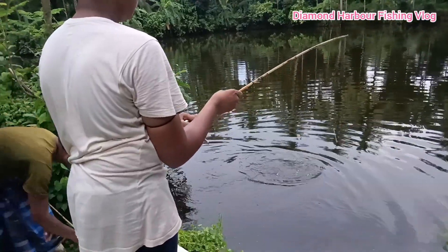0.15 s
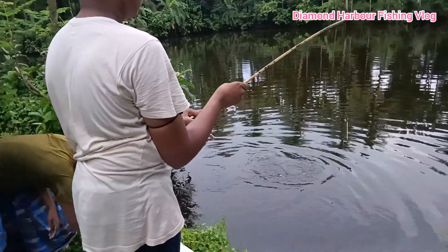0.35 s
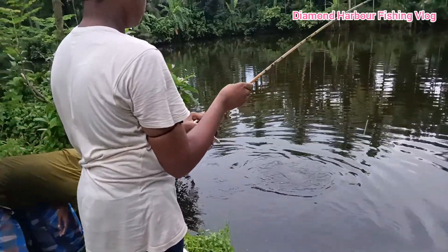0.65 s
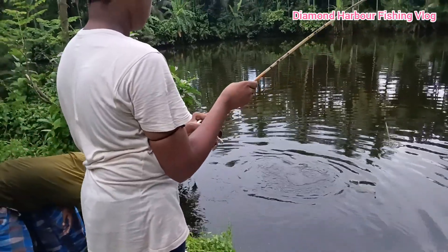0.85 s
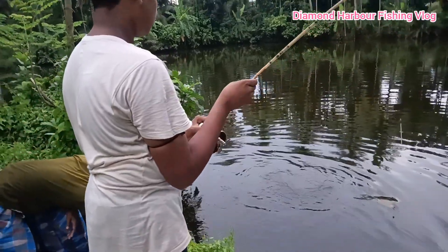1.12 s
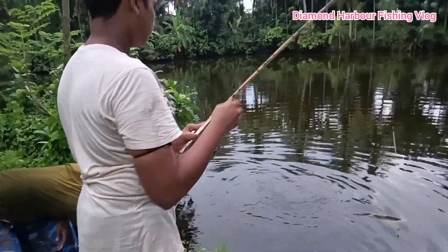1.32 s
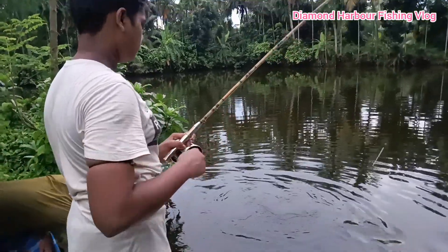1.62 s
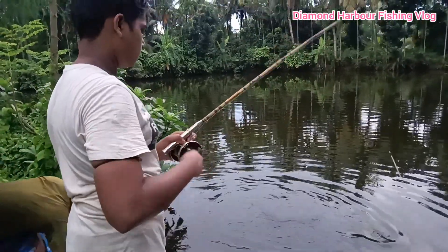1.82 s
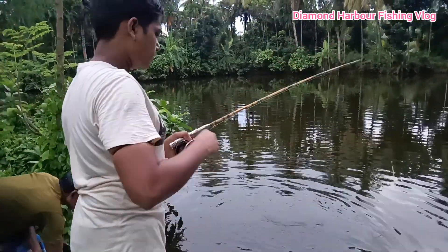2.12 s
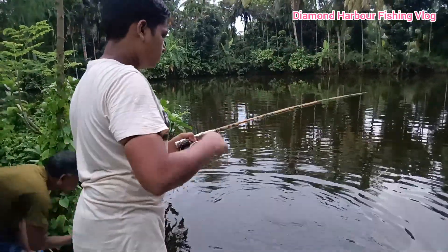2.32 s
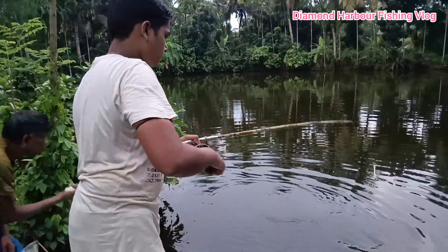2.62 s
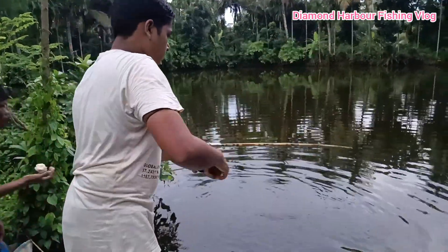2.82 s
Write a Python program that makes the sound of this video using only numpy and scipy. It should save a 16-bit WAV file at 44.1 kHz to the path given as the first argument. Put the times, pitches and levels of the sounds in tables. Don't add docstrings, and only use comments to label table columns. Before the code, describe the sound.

Beside a pond, distant birds warble through trees with soft leaf rustle and tiny drips; halfway through, a nearby fishing reel ticks and then buzzes rapidly in uneven bursts until the end, heard by a bass-light phone.

```python
import sys
import numpy as np
from scipy import signal
from scipy.fft import rfft, irfft
from scipy.io import wavfile
from scipy.ndimage import uniform_filter1d

SR = 44100
rng = np.random.default_rng(int(sys.argv[2]) if len(sys.argv) > 2 else 0)


def decibels_to_gain(level_db):
    exponent = np.asarray(level_db, float) / 20
    return 10 ** exponent


def store_pcm(level_fs):
    pcm = np.round(np.clip(level_fs, -1, 1) * 32767).astype(np.int16)
    wavfile.write(sys.argv[1], SR, np.atleast_2d(pcm).T)


N = 130095
WIND_START_S = 1.7072
SCRAPE_HZ = 4200


def reel(t):
    # (time [s], level [dB], scattered part [dB])
    single_ticks = [
        (1.5199, -27, 3),
        (1.6129, -26, 5.5),
        (1.6346, -24, 9.5),
    ]
    # (frequency [Hz], width [Hz], level [dB])
    body_modes = [(840, 162, -31.5), (1294, 540, -25), (1706, 344, -13.5), (2234, 424, 1.5),
                  (2865, 450, -10.5), (3518, 605, -10), (4320, 1700, -18), (5880, 1250, -18.5),
                  (6520, 680, -17.5), (7440, 960, -18), (8390, 1530, -28), (12700, 5400, -35),
                  (12700, 1900, -59), (15350, 470, -23.5)]
    ticks = np.array(single_ticks)
    run = teeth(t)
    times = np.r_[ticks[:, 0], run]
    at = np.minimum((times * SR).astype(int), N - 1)
    wound = np.maximum(times - WIND_START_S, 0)
    winding = wound > 0
    chance = rng.standard_normal((len(at), len(body_modes) + 1))

    tail_db, wet_rise_db, wet_rise_s = -15, 11, 0.4
    wet = decibels_to_gain(np.r_[ticks[:, 2], wet_rise_db * (1 - np.exp(-wound[3:] / wet_rise_s))])
    tooth_db = hand(run + .006, col=2) + 1.3 * chance[3:, -1]
    db = np.r_[ticks[:, 1], tooth_db]
    db = db - 10 * np.log10(1 + (wet * decibels_to_gain(tail_db + 7)) ** 2) * winding

    facing, bloom, shade = tone_changes(times, wound, db)
    dry, far = 0, 0
    for k, (hz, width, mode_db) in enumerate(body_modes):
        lean = np.zeros(len(at))
        if 3200 < hz < SCRAPE_HZ:
            lean = lean + facing
        if hz > SCRAPE_HZ:
            lean = lean + shade
        if 1100 < hz < 1900:
            lean = lean + bloom
        if hz < 1000:
            lean = lean - .75 * (db + 19) * winding
        if abs(hz - 2900) > 800:
            lean = lean + 3.2 * walk(14)[at] * winding
        hit = decibels_to_gain(db + mode_db + lean + 1.2 * chance[:, k])
        knock = np.zeros((2, N))
        knock[:, at] = hit * np.array([np.ones(len(at)), wet])
        if hz > SCRAPE_HZ:
            knock = scraped(knock)
        direct, scattered = body_ring(knock, hz, width, k)
        dry, far = dry + direct, far + scattered
    far = far + decibels_to_gain(3.0) * band(far, 2250, 380)
    return decibels_to_gain(39.5) * (dry + decibels_to_gain(tail_db) * swaying(far))


def hand(t, col):
    # (time of fastest turn [s], teeth rate there [teeth/s], level there [dB],
    # teeth rate in the lull before [teeth/s], level in that lull [dB])
    hand_surges = [(1.735, 168, -17, 158, -12.5), (1.812, 270, -12.5, 225, -16),
                   (1.890, 290, -16, 155, -19), (2.040, 315, -16, 170, -18.5),
                   (2.120, 270, -15.5, 245, -20), (2.180, 290, -14, 290, -20),
                   (2.250, 310, -13.5, 250, -18.5), (2.390, 285, -16, 245, -21.5),
                   (2.442, 320, -16, 265, -20), (2.558, 315, -13.5, 215, -21.5),
                   (2.648, 325, -14.5, 258, -24), (2.748, 320, -16, 205, -22.5),
                   (2.845, 290, -19, 258, -22.5), (2.945, 255, -20, 235, -26)]
    s = np.array(hand_surges)
    before = np.r_[WIND_START_S, s[:-1, 0]]
    lull_place = np.r_[0, 0.59 * np.ones(len(s) - 1)]
    lull = before + lull_place * (s[:, 0] - before)
    moments = np.c_[lull, s[:, 0]].ravel()
    values = s[:, [col + 2, col]].ravel()
    return np.interp(t, moments, values)


def teeth(t):
    rate = hand(t, col=1) * (t >= WIND_START_S)
    turned = np.cumsum(rate) / SR + t * 1e-6
    count = np.arange(int(turned[-1]))
    slip = .03 * rng.standard_normal(len(count)) * (count > 0)
    return np.interp(count + slip + 1e-3, turned, t)


def tone_changes(times, wound, db):
    winding = wound > 0
    turn_s, facing_s = .207, 2.53
    facing = 5.5 * np.cos(2 * np.pi * (times - facing_s) / turn_s) * winding
    facing = facing + 5 * wound - .75 * (db + 20.5) * winding

    bloom_s = 0.033
    starting = np.exp(-((times - 1.76) / bloom_s) ** 2)
    slowing = np.exp(-((times - 2.895) / bloom_s) ** 2)
    bloom = 10.5 * (starting + slowing)

    shade = -5 / (1 + np.exp(-(times - 2.377) / 0.034))
    shade = shade - 4.5 * np.exp(-wound / 0.055)
    shade = shade - 0.51 * (db + 19.0) * winding
    return facing, bloom, shade


def scraped(knock):
    u, scrape_s = np.arange(600) / SR, .0022
    scrape = u / scrape_s * np.exp(-u / scrape_s * 2)
    scrape /= np.sqrt(np.sum(scrape ** 2))
    return signal.lfilter(scrape, 1, knock) * rng.standard_normal(N)


def body_ring(knock, hz, width, k):
    u = np.arange(600) / SR
    spread = .5 / width
    late = (.0024 if hz < SCRAPE_HZ else .0012) + .0003 * np.cos(2.4 * k)
    bell = np.exp(-((u - late) / spread) ** 2) * np.sin(2 * np.pi * hz * (u - late)) / spread / SR
    return signal.fftconvolve(knock, bell[None])[:, :N]


def swaying(x):
    sway_s = .12
    turn = np.arange(N) / SR / sway_s * np.pi / 2
    out = 0
    for k in range(4):
        fade = np.maximum(np.cos(turn - k * np.pi / 2), 0)
        out = out + echoes(x * fade, t60=.1, late=.003)
    return out


def birds(t):
    # (start [s], length [s], first pitch [Hz], last pitch [Hz], level [dB])
    bird_whistles = [(0, .13, 1890, 1885, -52), (.012, .19, 2360, 2420, -46), (0, .3, 1340, 1310, -60),
                     (.13, .06, 2000, 2000, -55), (.17, .15, 2320, 2120, -52), (.21, .14, 2400, 2400, -51),
                     (.365, .045, 2400, 2300, -49), (.416, .25, 2520, 2530, -47),
                     (.497, .063, 2400, 1520, -48), (.56, .045, 1520, 2100, -52),
                     (.595, .15, 2220, 2225, -45), (.75, .05, 2110, 2080, -51), (.81, .2, 2215, 2220, -56),
                     (.66, .045, 600, 590, -59), (1.1, .15, 1365, 1405, -57), (1.14, .1, 2190, 2170, -65),
                     (1.42, .08, 2520, 2520, -68), (.6, .07, 3400, 3400, -66), (.36, .25, 1300, 1330, -66),
                     (.5, .1, 700, 690, -66), (.04, .12, 700, 720, -66)]
    out, warble, wobble = 0, walk(80), walk(40)
    for k, (start, length, f0, f1, db) in enumerate(bird_whistles):
        u = (t - start) / length
        shape = np.clip(np.minimum(u, 1 - u) * length / 0.004, 0, 1)
        glide = f0 + (f1 - f0) * np.clip(u, 0, 1)
        hz = glide * (1 + .004 * np.roll(wobble, 5000 * k))
        loudness = decibels_to_gain(db + 3.6 * np.roll(warble, 7000 * k))
        out = out + loudness * shape * np.sin(2 * np.pi * np.cumsum(hz) / SR)
    trees = echoes(out, t60=0.3, late=0.014)
    return decibels_to_gain(0.5) * (out + trees)


def drips(t):
    # (start [s], frequency [Hz], width [Hz], length [s], level [dB])
    drip_ticks = [(.436, 4000, 2500, .002, -46), (.55, 3300, 800, .008, -50), (.655, 3450, 500, .01, -46),
                  (.695, 4600, 900, .012, -49), (.52, 4400, 400, .02, -52), (.84, 3500, 500, .02, -50),
                  (.89, 3400, 1200, .01, -50), (1.272, 3200, 2500, .002, -45), (1.41, 5000, 300, .02, -49),
                  (1.14, 4900, 300, .03, -57), (.73, 5200, 900, .015, -52)]
    grit = rng.standard_normal(N)
    out = 0
    for start, hz, width, length, db in drip_ticks:
        u = np.maximum((t - start) / length, 0)
        puff = u * np.exp(-u)
        out = out + band(decibels_to_gain(db + 9) * grit * puff, hz, width, order=2)
    return out


def bank(t):
    return still_air() + rustling(t) + insects(t)


def still_air():
    # (frequency [Hz], level per Hz [dB])
    air_colour = [(18, -60), (30, -22), (314, -12), (1210, -10.5), (1420, -4.5), (1570, -13), (2810, -21),
                  (9230, -30), (16500, -53)]
    f, air = np.maximum(np.arange(N // 2 + 1) * SR / N, 1), np.array(air_colour)
    colour = decibels_to_gain(np.interp(np.log(f), np.log(air[:, 0]), air[:, 1]))
    still = irfft(rfft(rng.standard_normal(N)) * colour, N)
    return decibels_to_gain(-57.5 - 4) * unit(still)


def rustling(t):
    # (time [s], level [dB])
    rustle_swell = [
        (0, -53.5),
        (.45, -56.5),
        (.6, -49),
        (.95, -53),
        (1.1, -60),
        (1.5, -72),
        (2.95, -52),
    ]
    # (frequency [Hz], width [Hz], level [dB])
    rustle_bands = [(756, 900, -13), (1210, 190, -14), (2135, 630, 0), (3370, 2700, -18.5),
                    (4630, 2700, -26)]
    rustle = sum(decibels_to_gain(db) * flicker(hz, width, 1.8, 25) for hz, width, db in rustle_bands)
    return decibels_to_gain(np.interp(t, *np.array(rustle_swell).T)) * rustle


def insects(t):
    # (frequency [Hz], width [Hz], level [dB])
    chorus_voices = [
        (92.4, 83, -66),
        (6600, 120, -76.5),
        (7470, 1200, -72),
        (8930, 530, -69),
        (9410, 180, -70.5),
        (15100, 1400, -87),
    ]
    chorus = sum(decibels_to_gain(db) * flicker(hz, width, 0.7, 13.54) for hz, width, db in chorus_voices)
    return decibels_to_gain(-1.5 * np.minimum(t, 1.4)) * chorus


def flicker(hz, width, flick_db, rate):
    voice = unit(band(rng.standard_normal(N), hz, width, order=2))
    return voice * decibels_to_gain(flick_db * walk(rate))


def echoes(x, t60, late):
    u = np.arange(int(SR * .8)) / SR
    h = rng.standard_normal(len(u)) * decibels_to_gain(-60 * u / t60) * np.clip(u / late, 0, 1) ** 2
    return signal.fftconvolve(x, h / np.sqrt(np.sum(h ** 2)))[:N]


def band(x, hz, width, order=1):
    b, a = signal.iirpeak(min(hz, .45 * SR), hz / width, SR)
    for _ in range(order):
        x = signal.lfilter(b, a, x)
    return x


def unit(x):
    return x / np.sqrt(np.mean(x ** 2))


def walk(rate):
    k = int(SR / rate)
    held = np.repeat(rng.standard_normal(N // k + 1), k)
    return 1.11 * uniform_filter1d(uniform_filter1d(held, k), k)[:N]


def scene():
    t = np.arange(N) / SR
    mid = reel(t) + birds(t) + drips(t) + bank(t)
    return np.array([mid, mid])


def low_pass(x):
    return signal.sosfilt(signal.butter(12, 16990, fs=SR, output="sos"), x)


def record(dry):
    top_cut = signal.ellip(12, .2, 70, 15780, fs=SR, output="sos")
    mix = signal.sosfilt(top_cut, np.tanh(dry))
    return low_pass(mix)


dry = scene()
out = record(dry)
store_pcm(out)
```